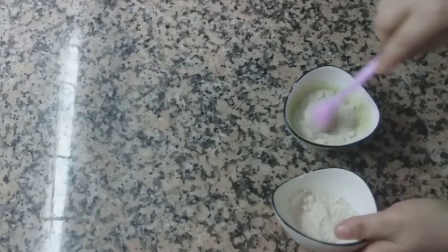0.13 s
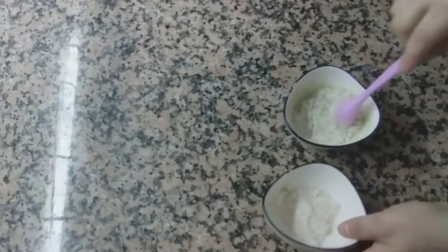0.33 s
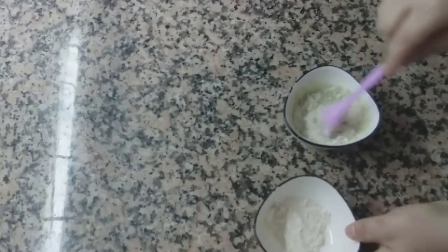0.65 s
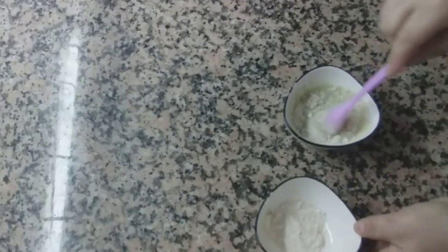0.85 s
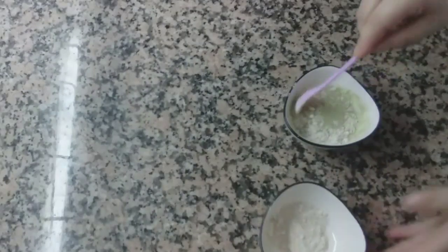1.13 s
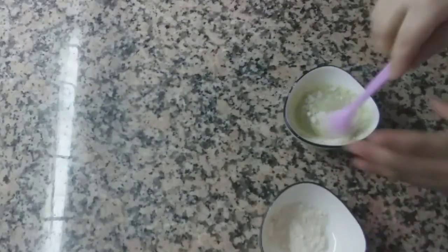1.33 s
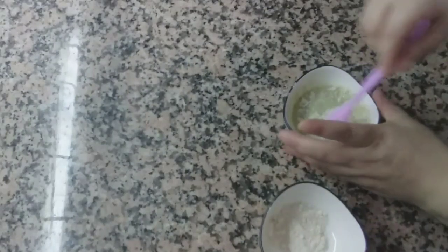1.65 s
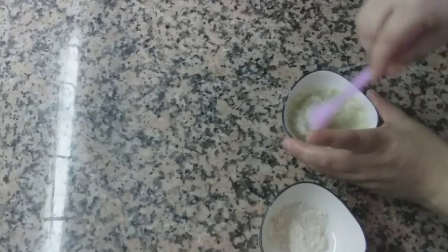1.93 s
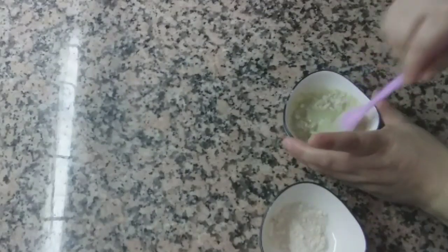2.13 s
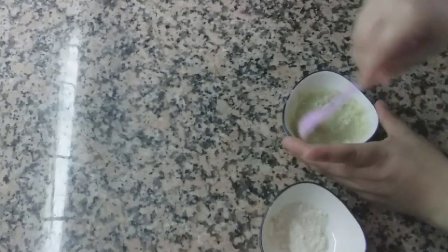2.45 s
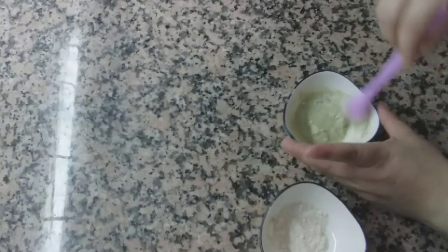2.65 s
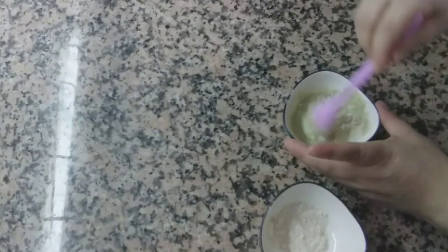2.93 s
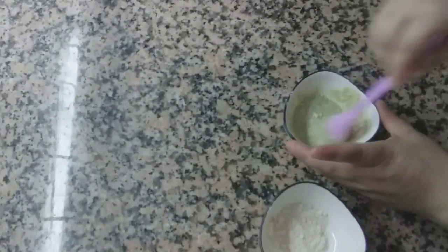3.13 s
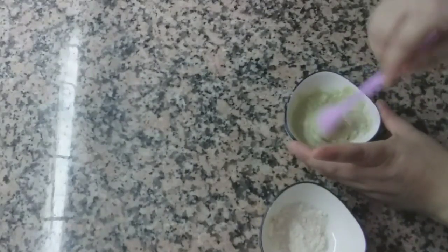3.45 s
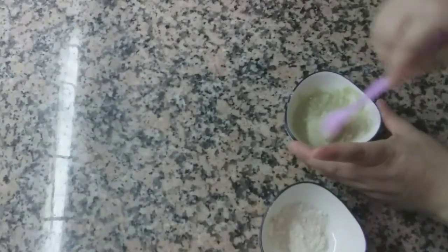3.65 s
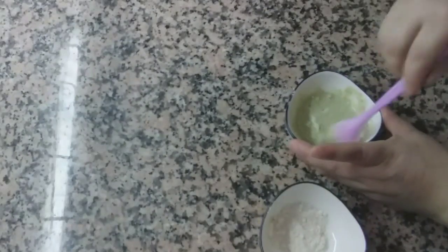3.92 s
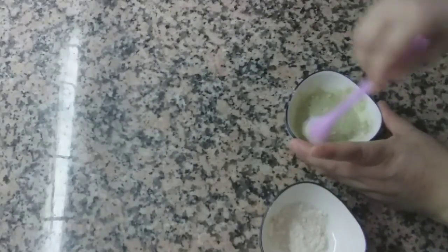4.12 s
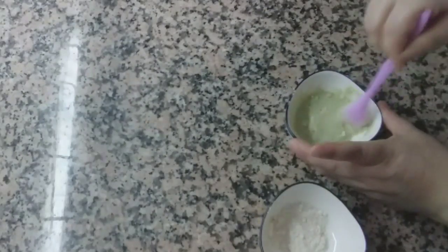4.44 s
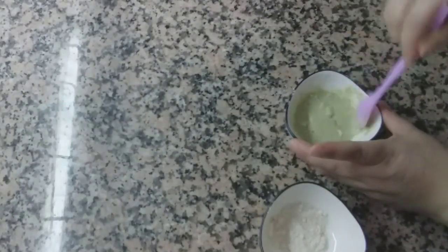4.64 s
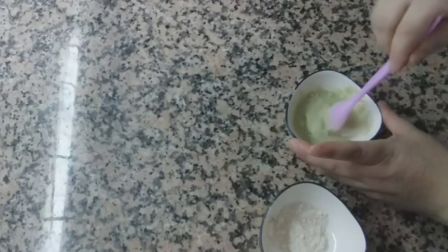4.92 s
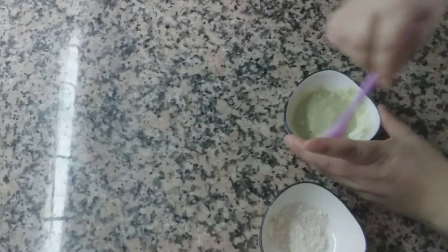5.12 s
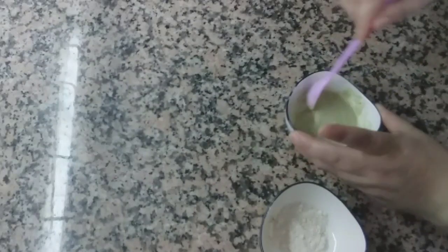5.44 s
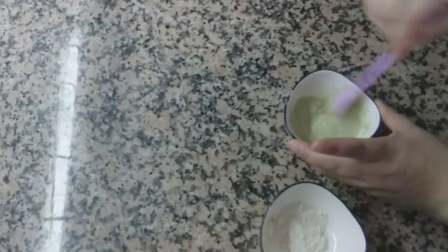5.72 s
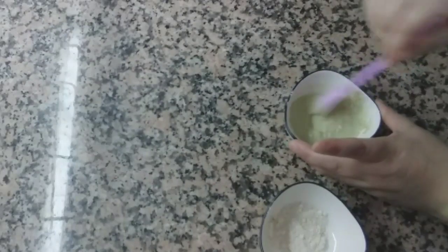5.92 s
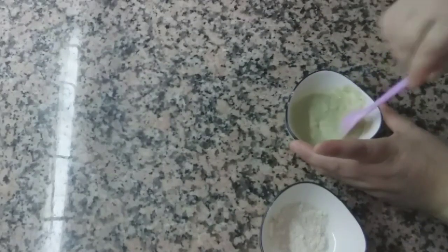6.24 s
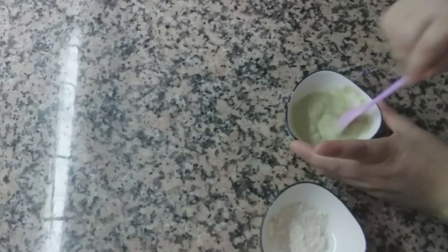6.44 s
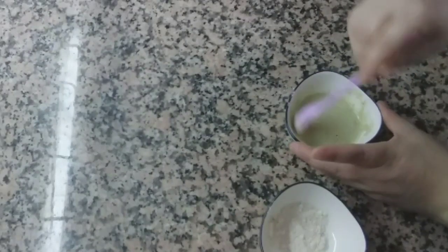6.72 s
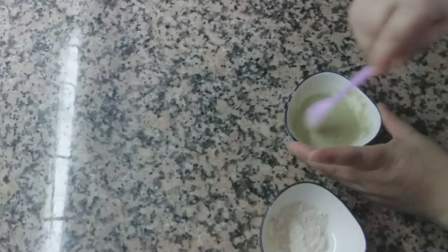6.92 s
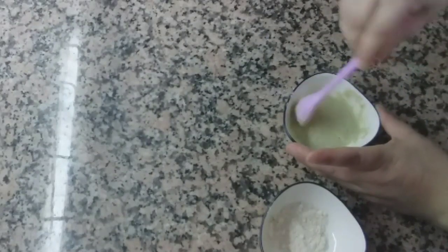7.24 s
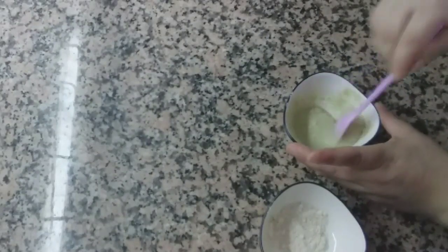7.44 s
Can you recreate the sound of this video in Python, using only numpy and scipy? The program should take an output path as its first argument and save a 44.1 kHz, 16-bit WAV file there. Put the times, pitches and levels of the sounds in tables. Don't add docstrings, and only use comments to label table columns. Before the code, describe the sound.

Two loud bursts of ceramic clatter on stone come first, hard and briefly ringing. Much quieter stirring follows: grainy plastic scrapes, damped taps against a paste-filled bowl, bright little snaps on glaze, and a few medium bowl knocks. The taps grow firmer near the end. Close microphone, short reflective kitchen echo, low steady refrigerator hum and airy hiss.

```python
import sys
import numpy as np
from scipy import signal
from scipy.io import wavfile
from scipy.ndimage import uniform_filter1d

SR = 44100
rng = np.random.default_rng(int(sys.argv[2]) if len(sys.argv) > 2 else 0)


def put_to_file(sound):
    columns = np.atleast_2d(sound).T
    safe = np.clip(columns, -1, 1)
    whole_steps = np.round(safe * 32767)
    wavfile.write(sys.argv[1], SR, whole_steps.astype(np.int16))


def magnitude_from_level(level_db):
    exponent = np.asarray(level_db, float) / 20
    return 10 ** exponent


N = 333852

# (time [s], peak [dB], counter thump [dB], bowl ring [dB], hard tick [dB])
EMPTY_BLOWS = [(0.36, -3, -6, -8, -17.5), (0.3682, -17, -10.5, -12, -22.5), (0.4117, -3.5, -8, -5.5, -17.5),
               (0.4194, -23.5, -11.5, 0.5, -18), (0.4444, -5.5, -13, -9.5, -36),
               (0.4625, -12.5, -12, -15.5, -19), (0.4757, -24, -14.5, -30.5, -18),
               (0.4902, -17.5, -1, -11.5, -41.5), (0.5174, -32, -20, 13.5, -29), (0.6539, -43, -12, 9, -13),
               (0.7425, -45, 3.5, -9.5, -12), (0.8692, -22.5, -0.5, -10.5, -19.5),
               (0.9358, -57, -11, 17, -26), (1.034, -13, -6, -7.5, -19), (1.048, -13, -14.5, -11.5, -22),
               (1.0585, -11, -37.5, -5.5, -13.5), (1.0671, -13, -11, -2, -20.5),
               (1.0743, -19, 1, 8.5, -18.5), (1.1116, -15.5, -3.5, 3, -23.5),
               (1.1164, -37, -24.5, -15, -16.5), (1.1297, -41, -10, 13, -33), (1.163, -62.5, -11, 13, -19)]
EMPTY_HZ = [2700, 2890, 3212, 3255, 3740, 4540, 5800, 6940, 7140, 8420, 9700, 11030, 12320, 13600, 14920]
# (level [dB], t60 [s])
EMPTY_MODES = [(-12, .02), (-14, 0.024), (-6.5, 0.034), (-10.5, 0.11), (-12.5, 0.012), (-26, 0.026),
               (-32.5, 0.018), (-27, 0.062), (-31.5, 0.076), (-39.5, 0.05), (-41.5, 0.099), (-38.5, 0.14),
               (-43, .07), (-46.5, .06), (-41, .07)]
# (time [s], peak [dB], knock pitch [Hz], counter thump [dB], hardness [dB])
TIPS = [(1.748, -53.5, 1590, -5, -23), (1.7805, -50.5, 1640, -3.5, -9.5), (1.9912, -43, 1280, -4.5, -7),
        (2.0223, -20.5, 1930, -10, -13), (2.218, -46.5, 1370, -9, -2), (2.7353, -18.5, 1730, -8, -4.5),
        (2.7403, -19, 2140, -10, -2.5), (2.7484, -18.5, 2100, -9, -34), (2.7693, -34.5, 1700, 7.5, -27),
        (3.2332, -43.5, 1630, -16, -7.5), (4.9437, -37.5, 1500, -5, -16), (5.625, -19.5, 2080, -9.5, -17),
        (5.6308, -21, 1140, -2.5, -16), (5.67, -18, 1750, -9, -8), (5.6753, -40, 1735, 5, -21),
        (6.6149, -28.5, 1880, -6, -18)]
# (time [s], peak [dB], knock pitch [Hz], hardness [dB])
TAPS = [(2.1853, -34.5, 1510, -26), (3.5636, -46, 1850, -24.5), (3.5813, -37.5, 1510, -26),
        (3.8071, -38, 1416, -26.5), (4.1593, -33.5, 1510, -20), (4.354, -42.5, 1510, -29),
        (4.5538, -36.5, 1673, -19.5), (4.7, -49, 1510, -21.5), (4.7078, -34, 1470, -22.5),
        (5.0811, -31.5, 1140, -20), (5.8455, -38.5, 1324, -22), (6.1012, -35.5, 1510, -22),
        (6.352, -33, 1600, -22.5), (6.4955, -31.5, 1610, -25.5), (6.8917, -23, 1350, -15),
        (7.0639, -31.5, 1247, -18.5), (7.2692, -27, 1220, -18.5), (7.3568, -48, 1180, -28),
        (7.4363, -23.5, 1750, -20)]
# (time [s], peak [dB], knock pitch [Hz], tick [dB])
SNAPS = [
    (2.1354, -39, 1200, -5),
    (2.8761, -33, 2050, 3),
    (3.1525, -45.5, 1510, 2),
    (3.2868, -37, 1510, -2.5),
    (3.459, -53, 1590, -12),
    (6.2786, -56, 1296, -0.5),
]
# (frequency [Hz], level [dB], t60 [s])
FULL_MODES = [(2127, -11.5, 0.099), (2597, 6, 0.0077), (3046, -2, 0.024), (3193, 0.5, 0.027),
              (3674, -9, 0.026), (3800, -38, 0.0051), (5080, -19, 0.0048), (6780, -11.5, 0.0095)]
# (frequency [Hz], level [dB], t60 [s])
KNOCK = [(1060, -11.5, 0.01), (1140, -2, 0.0041), (1283, 1, 0.027), (1510, -0.5, .025), (1746, -2.5, 0.014),
         (1831, 4.5, 0.017), (2195, -3, 0.024), (2176, -1, 0.0051)]
# (frequency [Hz], level [dB], t60 [s])
COUNTER = [(124.6, -14, 0.15), (244, -9.5, 0.044), (320, -2, 0.03), (397.7, 0.5, 0.05), (455, -4, 0.036),
           (551.4, -7, 0.042), (660, -4, 0.03), (736, -0.5, 0.04), (800.2, 1, 0.05), (920, -4.5, 0.0066),
           (1045.6, -3.5, 0.099), (1140, -3.5, 0.034)]
# (frequency [Hz], level [dB])
STONE_TICK = [(150, -26.5), (1000, -4), (3000, 10), (5000, -6.5), (7000, -11.5), (9000, -16.5),
              (15500, -16.5), (17000, -43.5)]
# (frequency [Hz], level [dB])
SPOON_TICK = [(300, -29), (1200, -1.5), (3000, 6), (5000, -1), (6500, -11), (9000, -17), (15500, -19),
              (17000, -40.5)]
# (full pressure at [s], held [s], level [dB])
STROKES = [(1.8, 0.089, -60), (2.02, .02, -53), (2.3, 0.027, -60), (2.62, .1, -70.5), (2.88, 0.057, -52.5),
           (3.1, 0.13, -60.5), (3.45, 0.15, -57.5), (3.72, 0.048, -66.5), (4.1, 0.14, -64),
           (4.38, 0.065, -73), (4.73, 0.029, -62), (5.14, 0.22, -56), (5.33, 0.038, -63),
           (5.91, 0.21, -61.5), (6.32, .09, -59.5), (6.69, 0.032, -56), (7.14, 0.017, -60.5),
           (7.35, 0.018, -67), (7.56, .02, -57)]
# (frequency [Hz], level [dB])
SCRAPE = [(400, -15), (1000, -1.5), (1600, -2.5), (2400, -9.5), (3200, -0.5), (4500, -7), (5500, -8.5),
          (7000, -12), (8500, -27), (16000, -31)]
# (full pressure at [s], held [s], level [dB])
SLIDES = [
    (5.24, 0.095, -56),
    (5.49, 0.087, -78.5),
    (5.617, .004, -62),
]
# (frequency [Hz], width [Hz], level [dB])
DRAGGED = [(713, 150, -7.5), (818, 112, 1), (1040, 115, -2), (1180, 110, -10), (1750, 580, -19)]
# (time [s], peak [dB], pitch [Hz])
POPS = [
    (2.3965, -59, 6730),
    (3.0997, -60, 7140),
    (3.3294, -60.5, 6200),
    (6.724, -50, 6700),
    (7.1662, -60.5, 6750),
]
# (delay [s], level [dB])
ECHOES = [(.0021, -14.5), (.0048, -2.5), (.0083, -11), (.0125, -7.5), (.0165, -12), (.023, -18),
          (.029, -20)]
# (frequency [Hz], t60 [s])
KITCHEN = [(150, 0.48), (400, 0.5), (1000, 0.45), (2800, 0.41), (7000, .45), (15000, 0.34)]
# (frequency [Hz], level [dB per Hz])
FRIDGE_AIR = [(20, -32.5), (60, 5), (95, -10.5), (200, -5.5), (270, 0), (420, -6), (650, -12.5),
              (1000, -22.5), (2400, -24.5), (4000, -25.5), (6500, -24.5), (8000, -33), (15000, -32),
              (16500, -42.5)]
# (frequency [Hz], width [Hz], level [dB])
FRIDGE_BANDS = [(125, 52, -59.5), (260, 63, -68.5), (3240, 120, -78.5), (4036, 74, -83), (5032, 850, -79.5)]


def empty_bowl():
    knock_hz = 1770
    landings = [(s, db, knock_hz, *shares) for s, db, *shares in EMPTY_BLOWS]
    modes = np.column_stack([EMPTY_HZ, EMPTY_MODES])
    return blows(landings, modes, damping=1.8, focus_db=14.0, ring_db=-5.5, thump_db=-1.5, tick_db=8.5,
                 grip_db=1.0, crack_s=.012, chatter_db=-11.5, colour=STONE_TICK)


def full_bowl():
    tips = [(s, db, hz, thump, hard + 0.4, hard) for s, db, hz, thump, hard in TIPS]
    taps = [(s, db, hz, -14.5, hard + 1.5, hard) for s, db, hz, hard in TAPS]
    snaps = [(s, db, hz, -11.5, tick - 31, tick) for s, db, hz, tick in SNAPS]
    contacts = sorted(tips + taps + snaps)
    return blows(contacts, FULL_MODES, damping=1.74, focus_db=14.5, ring_db=5.0, thump_db=2.0, tick_db=6,
                 grip_db=-0.5, crack_s=0.01, chatter_db=-16.5, colour=SPOON_TICK)


def blows(rows, bowl, damping, focus_db, ring_db, thump_db, tick_db, grip_db, crack_s, chatter_db, colour):
    body, ticks = np.zeros(N), np.zeros(N)
    times = np.transpose(rows)[0]
    t = np.arange(3000) / SR
    crack = magnitude_from_level(-60 * t / crack_s) + magnitude_from_level(chatter_db - 60 * t / 0.086)
    for s, peak_db, hz, thump_share, ring_share, tick_share in rows:
        near = [(f, db - focus_db * abs(np.log2(f / hz)), t60 / damping) for f, db, t60 in KNOCK]
        knock = ring(near, spread_db=2, wander=.03, rise_s=0.0006, seconds=.08)
        thump = ring(COUNTER, spread_db=2.0, wander=0.027, rise_s=0.00042, seconds=.25)
        thump = magnitude_from_level(thump_share + thump_db) * thump
        clink = magnitude_from_level(ring_share + ring_db) * ring(bowl, spread_db=1.5, rise_s=0.00045)
        later = np.searchsorted(times[times > s] - s, np.arange(len(clink)) / SR)
        clink = clink * uniform_filter1d(magnitude_from_level(-grip_db * later), size=40)
        for part in knock, thump, clink:
            add(body, s + .0004, magnitude_from_level(peak_db) * part)
        tick = magnitude_from_level(peak_db + tick_share + tick_db)
        add(ticks, s + .0007, tick * magnitude_from_level(7.5) * np.ones(1))
        add(ticks, s + .0008, tick * crack * rng.standard_normal(len(t)))
    return body, coloured(ticks, colour)


def ring(modes, spread_db=0, wander=0, rise_s=.0001, seconds=0.47):
    t = np.arange(round(seconds * SR)) / SR
    hz, db, t60 = np.transpose(modes)[:, :, None]
    phase, level_luck, pitch_luck = rng.standard_normal((3, len(modes), 1))
    decay = magnitude_from_level(db + spread_db * level_luck - 60 * t / t60)
    tones = np.sin(2 * np.pi * (hz * (1 + wander * pitch_luck) * t + phase))
    x = (decay * tones).sum(0) * (1 - np.exp(-t / rise_s)) ** 2
    return x / abs(x).max()


def stirring():
    foot = grains(2500, spread_db=4.5)
    spoon = magnitude_from_level(-13.5) * evened(coloured(grains(2700, spread_db=1.0), SCRAPE))
    drag = sum(magnitude_from_level(db) * band(foot, hz, width) for hz, width, db in DRAGGED)
    drag = magnitude_from_level(3.0) * evened(drag)
    strokes = pressure(STROKES, rise_db_s=139, fall_db_s=54)
    slides = pressure(SLIDES, rise_db_s=260, fall_db_s=250)
    return spoon * strokes + drag * slides


def grains(per_s, spread_db):
    slips = rng.random(N) < per_s / SR
    return rng.standard_normal(N) * slips * magnitude_from_level(spread_db * rng.exponential(1, N))


def pressure(rows, rise_db_s, fall_db_s):
    t = np.arange(0, N / SR, .002)
    level_db = []
    for s, held, db in rows:
        rise = rise_db_s * np.maximum(s - t, 0)
        fall = fall_db_s * np.maximum(t - s - held, 0)
        level_db.append(db - rise - fall)
    return np.interp(np.arange(N) / SR, t, magnitude_from_level(np.max(level_db, axis=0)))


def pops():
    out = np.zeros(N)
    for s, peak_db, hz in POPS:
        add(out, s, magnitude_from_level(peak_db - 3) * ring([(hz, 0, .012)], rise_s=0.00097))
    return out


def kitchen(x, wet_db, tail_db):
    taps = np.zeros((2, SR))
    at = np.arange(200, SR - 20, 20)
    places = at + rng.integers(0, 20, (2, len(at)))
    np.put_along_axis(taps, places, rng.choice([-1., 1.], (2, len(at))), axis=1)
    hz, t, z = signal.stft(taps, SR, nperseg=256)
    decay = magnitude_from_level(-60 * t / read(KITCHEN, hz)[:, None])
    tail = signal.istft(z * decay, SR, nperseg=256)[1]
    tail = magnitude_from_level(tail_db) * tail / np.linalg.norm(tail[0])
    shifts_per_s = 1.3
    turn = 2 * np.pi * shifts_per_s * np.arange(N) / SR
    sent = x * np.array([np.cos(turn), np.sin(turn)])
    late = signal.fftconvolve(sent, tail, axes=1)[:, :N].sum(0)
    for k, (s, db) in enumerate(ECHOES):
        add(late, s, (-1) ** k * magnitude_from_level(db) * x)
    return x + magnitude_from_level(wet_db) * late


def refrigerator():
    air = magnitude_from_level(-65.5) * evened(coloured(rng.standard_normal(N), FRIDGE_AIR))
    machine = np.zeros(N)
    for hz, width, db in FRIDGE_BANDS:
        machine += magnitude_from_level(db) * evened(band(rng.standard_normal(N), hz, width))
    return air + machine


def evened(x):
    return x / np.sqrt(np.mean(x ** 2) + 1e-20)


def read(points, hz):
    f, value = np.transpose(points)
    return np.interp(np.log(hz + 1), np.log(f + 1), value)


def add(mix, s, sound):
    part = mix[round(s * SR):][:len(sound)]
    part += sound[:len(part)]


def coloured(x, points):
    log_gain = np.log(magnitude_from_level(read(points, abs(np.fft.fftfreq(4096, 1 / SR)))))
    spectrum = np.exp(log_gain - 1j * signal.hilbert(log_gain).imag)
    taps = np.fft.ifft(spectrum).real[:2048]
    return signal.oaconvolve(x, taps)[:len(x)]


def band(x, hz, width):
    r = np.exp(-np.pi * width / SR)
    b, a = [1 - r, 0, r - 1], [1, -2 * r * np.cos(2 * np.pi * hz / SR), r * r]
    return signal.lfilter(b, a, signal.lfilter(b, a, x))


def scene():
    empty, empty_ticks = empty_bowl()
    full, full_ticks = full_bowl()
    bodies = kitchen(empty, wet_db=-2.5, tail_db=0)
    bodies = bodies + kitchen(full + stirring(), wet_db=-2.5, tail_db=2.5)
    bright = kitchen(empty_ticks, wet_db=-6.7, tail_db=3.5)
    bright = bright + kitchen(full_ticks + pops(), wet_db=-5.5, tail_db=1)
    return (bodies + bright + refrigerator())[None]


def band_limit(x):
    return signal.sosfilt(signal.butter(12, 15800, fs=SR, output="sos"), x)


def record(dry):
    thin = signal.sosfilt(signal.butter(2, 45, "high", fs=SR, output="sos"), dry)
    knee = .8
    room = 1 - knee
    over = np.maximum(abs(thin) - knee, 0)
    rounded = thin - np.sign(thin) * (over - room * np.tanh(over / room) * knee)
    return band_limit(rounded)


dry = scene()
out = record(dry)
put_to_file(out)
```